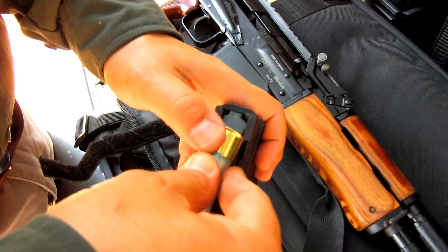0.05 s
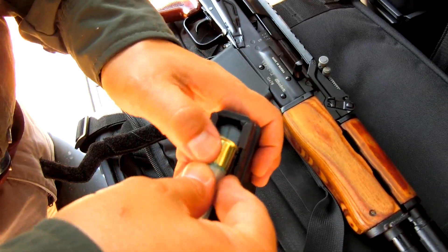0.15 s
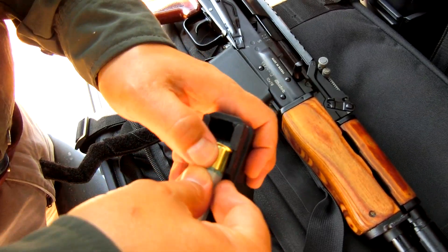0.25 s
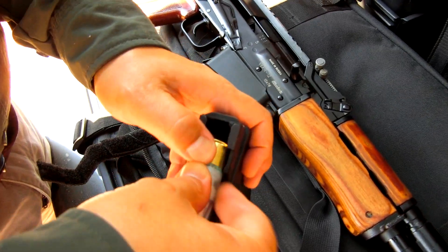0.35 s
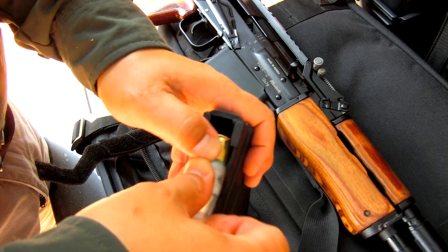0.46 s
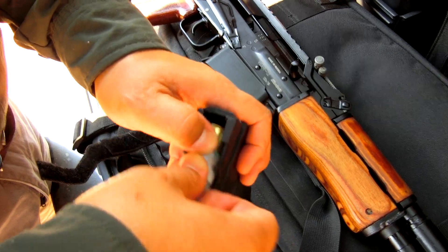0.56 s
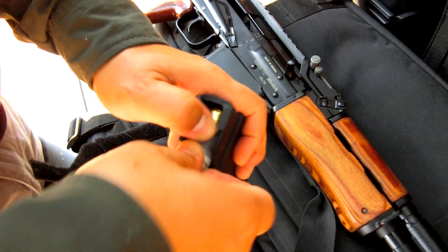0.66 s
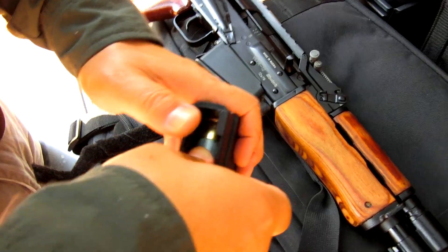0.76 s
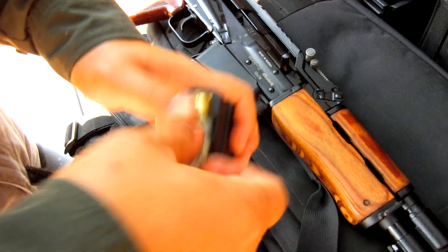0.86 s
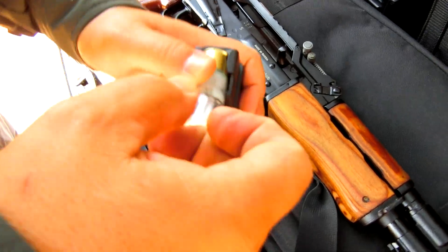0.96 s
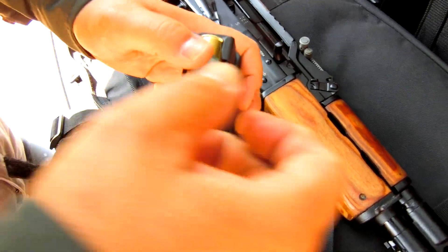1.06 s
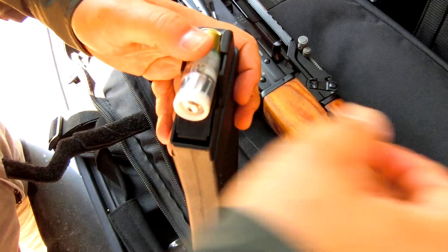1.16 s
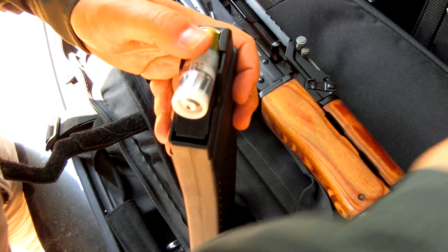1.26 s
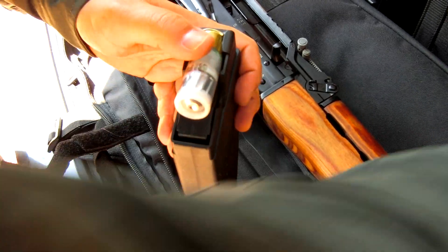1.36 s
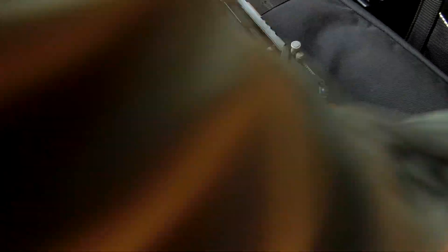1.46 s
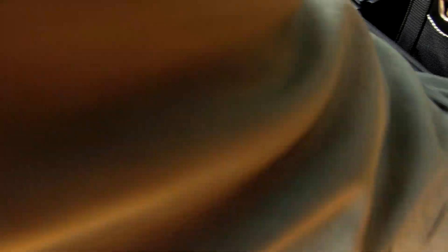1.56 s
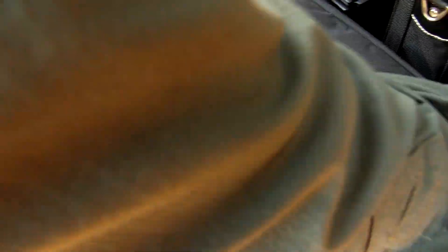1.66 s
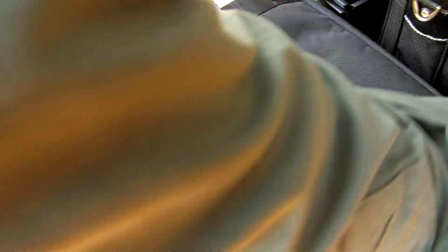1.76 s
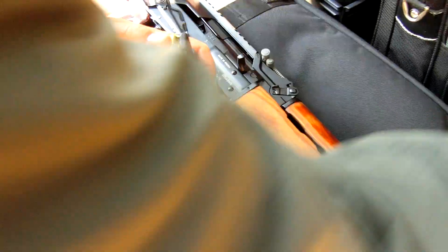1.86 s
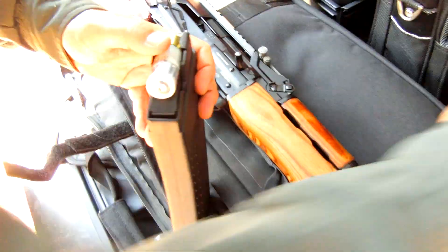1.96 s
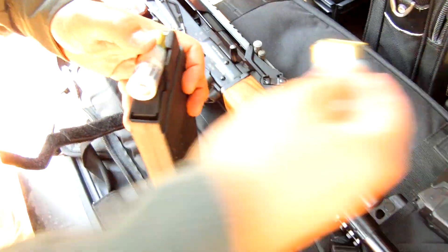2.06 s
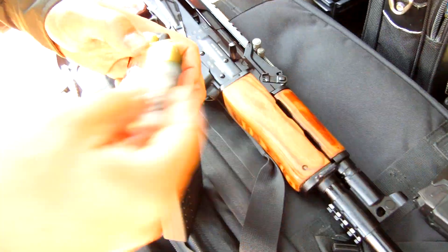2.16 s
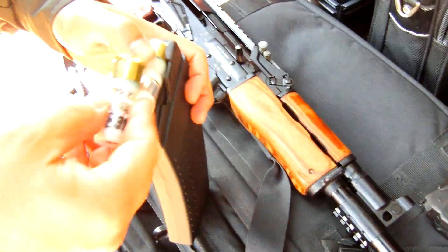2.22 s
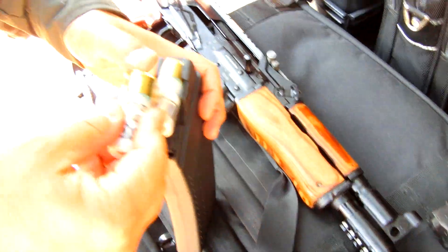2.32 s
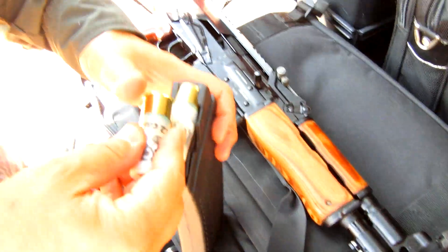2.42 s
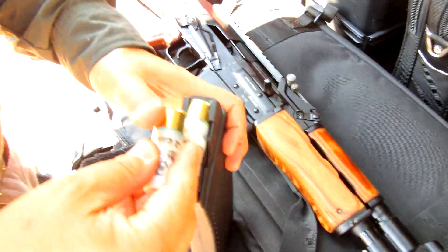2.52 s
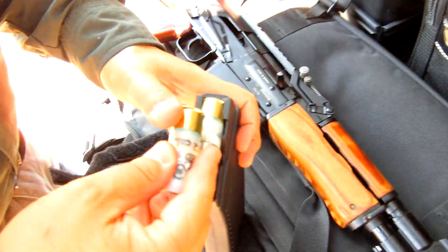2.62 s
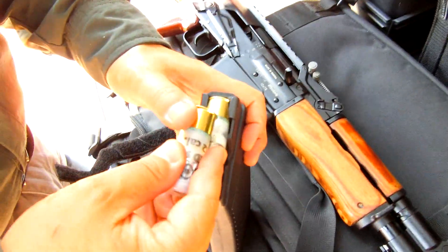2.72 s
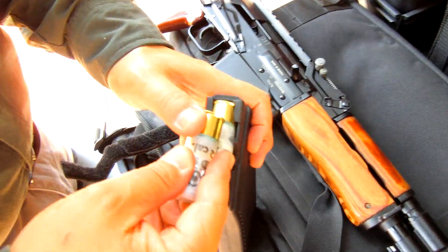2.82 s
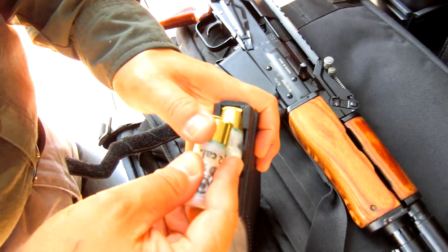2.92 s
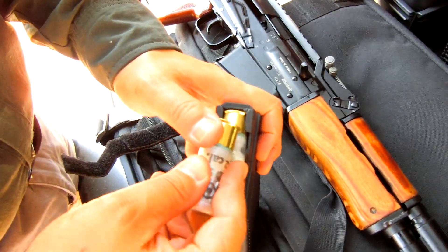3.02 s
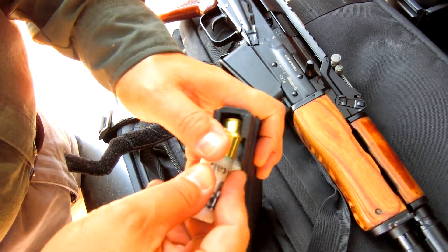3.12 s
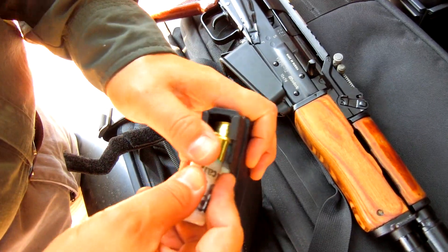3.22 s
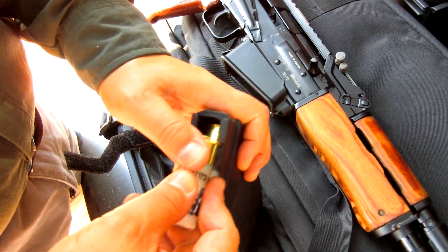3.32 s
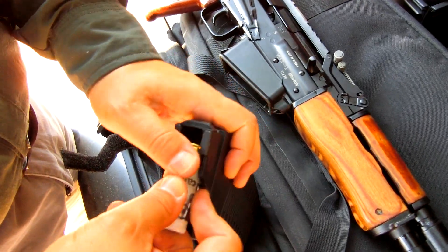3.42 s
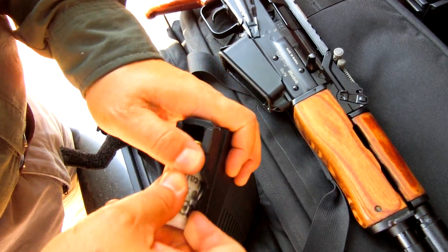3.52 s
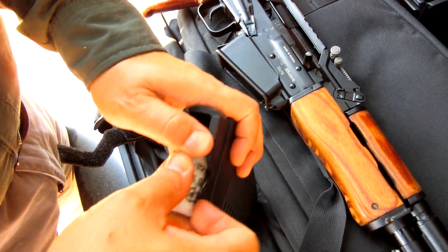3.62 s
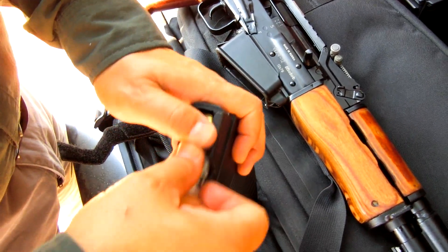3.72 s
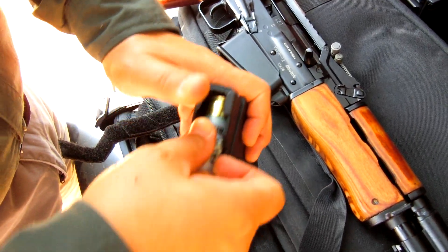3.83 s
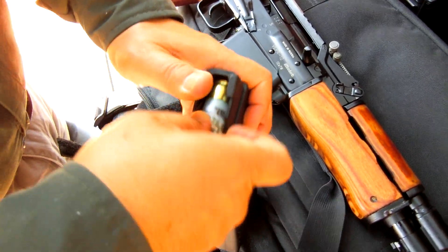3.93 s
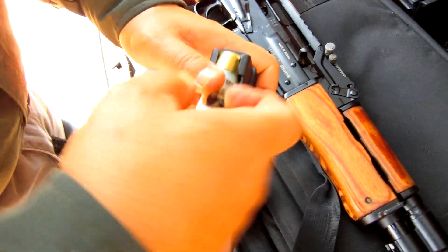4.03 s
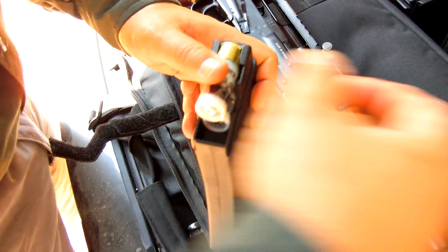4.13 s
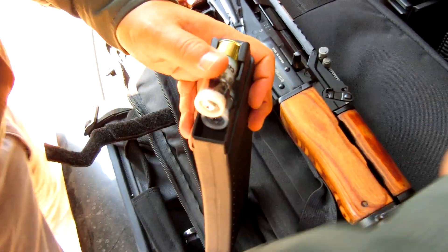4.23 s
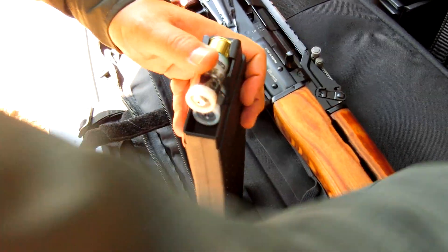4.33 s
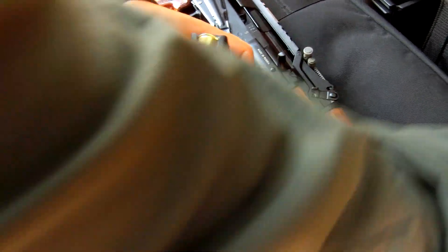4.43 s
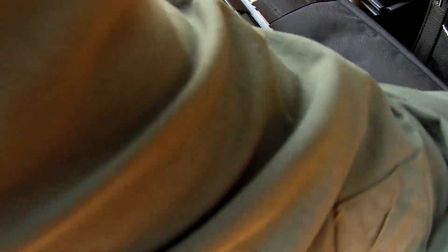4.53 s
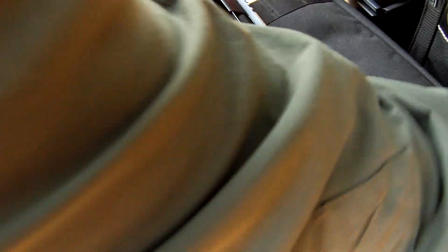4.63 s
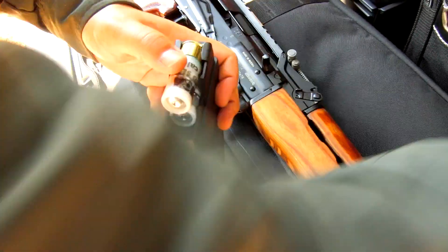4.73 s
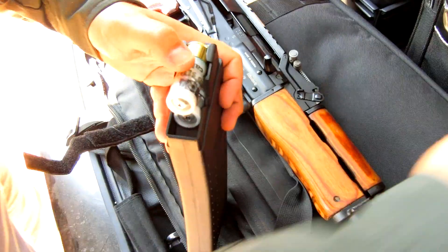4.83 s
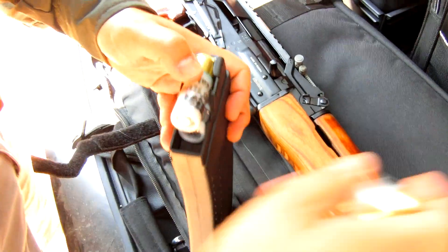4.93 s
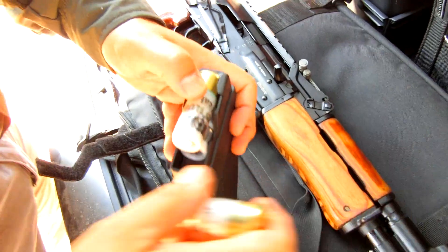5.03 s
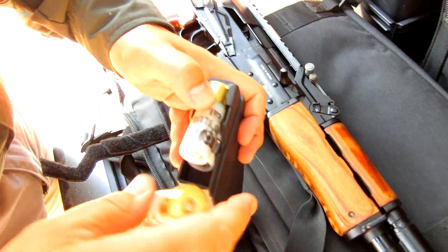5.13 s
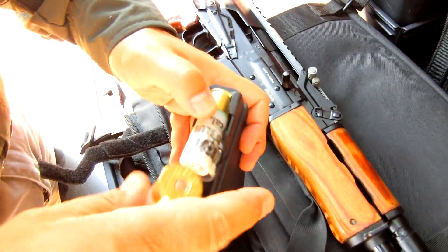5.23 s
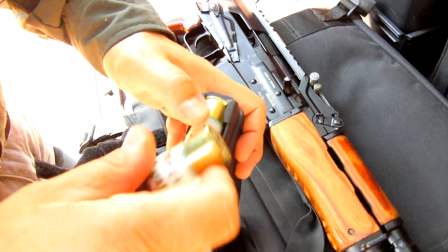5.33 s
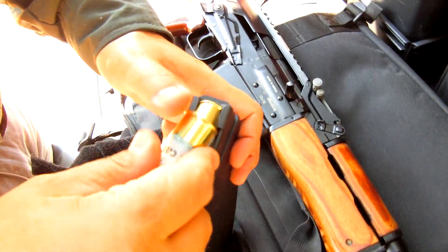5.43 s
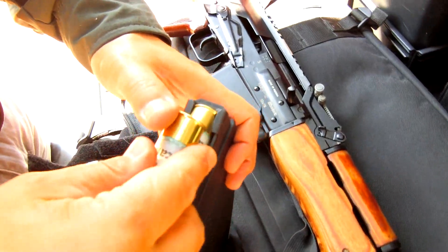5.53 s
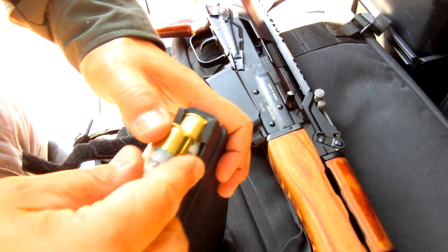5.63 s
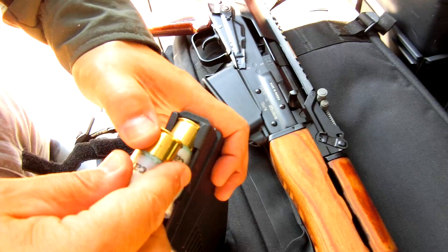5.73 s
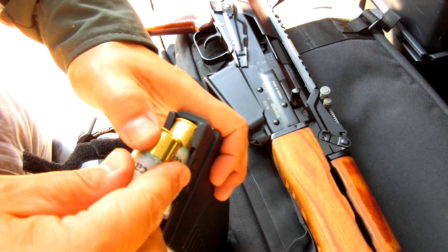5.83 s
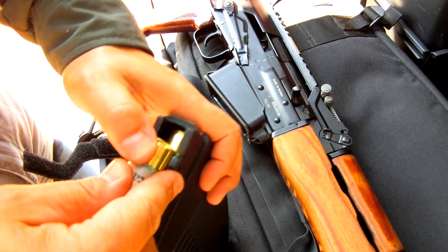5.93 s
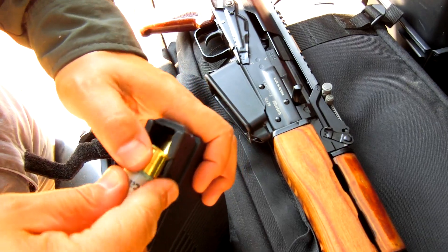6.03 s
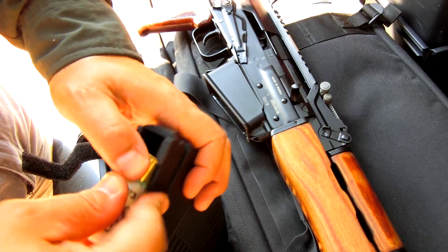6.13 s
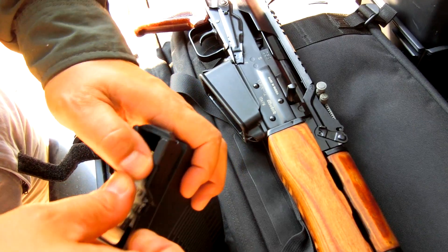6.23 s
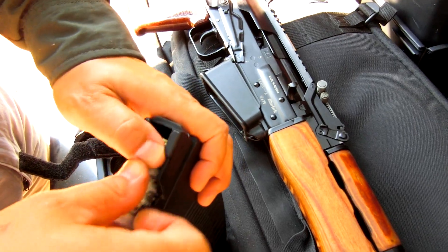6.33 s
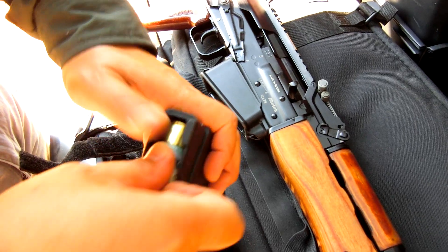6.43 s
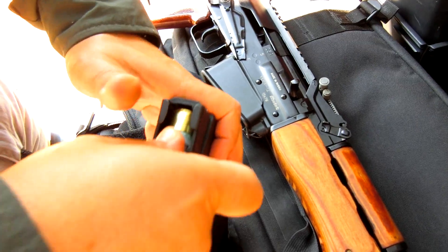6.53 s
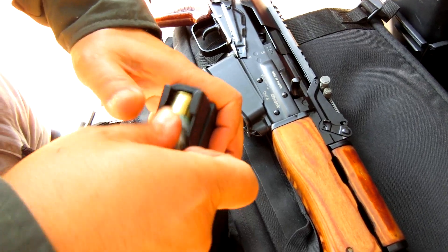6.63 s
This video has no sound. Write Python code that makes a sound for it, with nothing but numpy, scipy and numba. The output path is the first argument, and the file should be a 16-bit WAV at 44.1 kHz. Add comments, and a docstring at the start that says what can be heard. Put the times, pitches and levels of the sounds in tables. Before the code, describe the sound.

Extremely close, dry stereo sound of shotgun shells being pushed into a stiff plastic magazine at a vehicle doorway. From 0 to 0.3 seconds small clicks and a gritty slide build to a very loud crack at 0.35, followed by hard clacks at 0.63 and 0.84. A brief lull holds low air rumble and faint rising bird chirps. From 1.5 to 2.0 a sleeve rustles over duller, hollow knocks and scrapes, ending in a firm knock at 1.99. Light ticks and soft thumps follow, with one knock at 2.4. Around 3.06 to 3.2 sharp snaps return, the loudest crack at 3.32, then clacks at 3.63 and 3.94. It quiets, with a hollow tap near 4.6. A click at 5.42 leads to scrapes from 5.8, a tight cluster of loud clacks at 6.1 to 6.2, distant chirps, and a last snap at 6.63. Short, faint cabin echo throughout.

```python
"""Sharp snaps and hollow knocks, very close: shotgun shells pressed one by one into a stiff plastic magazine.
Place: a vehicle doorway; a small camera with two microphone ports sits close to the hands.
Snaps are blows on resonant plastic, hull and brass; scrapes are stick-slip noise through the same resonances.
Behind them: air rumbling on the ports, soft thumps, a rustling sleeve, short hums and a far chirping bird.
A faint decaying noise echo places the hands in the cabin."""
import sys
import numpy as np
from scipy import signal
from scipy.fft import rfft, irfft, next_fast_len
from scipy.io import wavfile
from scipy.ndimage import uniform_filter1d
from numba import njit

SR = 44100
rng = np.random.default_rng(int(sys.argv[2]) if len(sys.argv) > 2 else 0)


def to_wav(sig):
    """Store sig (one row per channel, or 1-D mono) as 16-bit WAV at the path in sys.argv[1].

    Samples outside -1..1 are clipped; the rate is SR.
    """
    pcm = np.clip(np.atleast_2d(sig), -1, 1) * 32767
    pcm = np.round(pcm).astype(np.int16)
    wavfile.write(sys.argv[1], SR, pcm.T)  # frames by channels


N = 294147

# Steady air on the ports. Each row: time in seconds, level in dB.
AIR_LEVELS = [(0.0, -55.5), (0.48, -53), (1.09, -64), (1.37, -64), (1.6, -55.5), (2.3, -60), (2.55, -51),
              (2.88, -59), (3.2, -48), (3.55, -60), (3.76, -50.5), (4.03, -70), (4.38, -60.5), (4.8, -63.5),
              (5.4, -69.5), (5.8, -60.5), (6.2, -63.5), (6.67, -66)]
# Spectrum of that air. Each row: frequency in Hz, relative density in dB.
AIR_SPECTRUM = [(12, -35), (20, -3.5), (62, 2.5), (119, -1.5), (160, -6.5), (198, -8.5), (255, -11.5),
                (400, -14.5), (520, -40), (880, -120)]
# Sleeve and surroundings. Each row: time in seconds, low hiss in dB, high hiss in dB.
RUSTLE_LEVELS = [(0.0, -64.5, -69.5), (0.69, -60.5, -58), (0.9, -74.5, -75), (1.12, -67.5, -70.5),
                 (1.29, -57, -56), (1.46, -60.5, -62), (1.69, -48.5, -53), (1.9, -54, -57),
                 (2.19, -62.5, -67.5), (2.99, -66, -66), (3.23, -62, -65.5), (3.96, -66, -69),
                 (4.74, -64, -64.5), (5.35, -69, -69), (5.79, -63.5, -70), (6.08, -57, -65),
                 (6.46, -67.5, -69.5), (6.67, -68.5, -67)]
# Spectrum of the hiss. Each row: frequency in Hz, relative density in dB.
HISS_SPECTRUM = [(150, -43.5), (250, -7.5), (528, -10), (640, -5.5), (845, -9), (971, -9), (1280, -10),
                 (7060, -19.5), (13200, -15.5), (16000, -25.5)]
# Rising chirps. Each row: start in seconds, length in seconds, from Hz, to Hz, level before flutter in dB.
CHIRPS = [(.905, .04, 4150, 4600, -73), (1.005, .045, 4050, 4600, -71), (1.125, .045, 4050, 4600, -72),
          (2.27, .045, 3900, 4600, -70), (2.68, .045, 3800, 4400, -70), (2.815, .05, 3900, 4700, -69),
          (2.955, .045, 3900, 4700, -69), (4.075, .04, 3900, 4500, -72), (6.408, .035, 3200, 5100, -66),
          (6.482, .024, 3500, 5200, -64), (6.546, .028, 3500, 5000, -65)]
# Soft thumps of air and handling. Each row: middle in seconds, peak before port lean in dB, pitch in Hz.
SOFT_THUMPS = [(0.005, -37, 156), (0.027, -43, 94), (0.162, -42, 117), (0.188, -31, 115), (0.258, -37, 146),
               (0.448, -32.5, 146), (0.495, -44, 112), (0.556, -42, 198), (1.033, -45, 167),
               (1.11, -40.5, 133.4), (1.518, -52, 110), (1.558, -39.5, 156), (1.696, -48, 120),
               (1.995, -43, 80), (2.091, -43.5, 99), (2.271, -44.5, 150), (2.457, -41, 120),
               (2.483, -46, 124), (2.537, -35.5, 133), (2.664, -40.5, 134.5), (2.693, -40.5, 116.6),
               (2.908, -40, 109.6), (3.05, -46, 97.7), (3.214, -42, 87), (3.254, -46, 75.5),
               (3.286, -41.5, 100), (3.379, -37, 98), (3.403, -42, 158), (3.524, -44, 92.5),
               (3.725, -41.5, 156), (3.856, -41, 132), (4.379, -49, 80.6), (5.872, -52, 88),
               (5.907, -45, 122), (6.02, -50.5, 80), (6.121, -44, 70), (6.2, -46, 70), (6.366, -46, 98),
               (6.641, -42, 79.6)]
# Short hums while something slides. Each row: start in seconds, length in seconds, pitch in Hz, peak in dB.
SLIDE_HUMS = [(.075, .11, 950, -53), (.12, .035, 4050, -60), (1.685, .08, 305, -41), (1.8, .07, 620, -47),
              (5.43, .08, 975, -66)]
# Resonances of the magazine body. Each row: frequency in Hz, width in Hz, relative level in dB.
BODY_MODES = [(410, 160, -7.5), (657, 540, -3.5), (1110, 440, -3.5), (1343, 300, -4), (1696, 130, -2.5),
              (2080, 560, -9.5), (2886, 890, 3), (3550, 1300, -1.5)]
# Resonances of the shell hull. Each row: frequency in Hz, width in Hz, relative level in dB.
HULL_MODES = [(4334, 730, 7.5), (4716, 690, 6.5), (5660, 1000, 10), (5950, 800, -16.5)]
# Resonances of the brass rim. Each row: frequency in Hz, width in Hz, relative level in dB.
BRASS_MODES = [(6670, 1800, 10.5), (8800, 3700, -1.5), (10360, 900, -7), (12000, 430, -7.5),
               (13300, 1800, -14.5)]
# Slides of hull on plastic. Each row: loudest moment in seconds, swell in seconds, fade in seconds,
# stroke level in dB, loudest ring in Hz, hull in dB and brass in dB, both against the stroke level.
STROKES = [(.09, 0.1, 0.4, -47.5, 1000, -3.5, -3.5), (0.243, 0.13, 0.031, -37, 2750, -6, -5),
           (0.333, 0.02, 0.052, -35, 2340, -5.5, -4.5), (.495, 0.0088, 0.12, -62, 2210, 9, 15),
           (0.558, 0.07, 0.033, -35.5, 2220, -5, -4.5), (.648, 0.014, .09, -31, 1970, -5.5, -10.5),
           (.685, .02, 0.073, -48, 2300, -6, -2.5), (0.816, 0.027, 0.039, -22.5, 2260, -6, -6.5),
           (.837, 0.01, 0.0064, -25, 2280, 3.5, 6.5), (1.519, .008, 0.24, -37, 790, -5, -4.5),
           (1.59, 0.12, .06, -32, 820, -5.5, -14), (1.665, .02, 0.024, -29, 810, -4, -12),
           (1.755, 0.021, 0.037, -47, 900, 14.5, 4), (1.81, 0.049, 0.056, -39, 1300, 4, -1.5),
           (1.845, 0.011, 0.0083, -36.5, 1000, 4.5, 0.5), (1.945, 0.067, 0.16, -44, 2550, 9.5, 6),
           (1.985, 0.073, .01, -64, 1580, 3, -6.5), (2.038, 0.12, 0.076, -52.5, 910, -3.5, 10),
           (2.172, 0.028, 0.039, -35.5, 1190, -5.5, -6.5), (2.436, 0.012, 0.042, -30, 890, 0.5, -3),
           (2.55, 0.075, 0.087, -59, 790, 2.5, -4), (2.664, .035, .035, -48.5, 1220, 0, -7),
           (2.729, 0.026, 0.064, -49.5, 2360, -5, -4.5), (2.943, .045, 0.026, -60, 1150, 1, -10),
           (3.073, 0.025, 0.085, -29.5, 2450, -7, -4), (3.11, .02, 0.066, -45, 1820, -6, -18),
           (3.311, 0.054, 0.0088, -39.5, 2210, -6, -6), (3.336, 0.013, 0.13, -36.5, 2330, -10, -14.5),
           (3.352, .004, 0.038, -35, 2300, -1.5, 2.5), (3.385, .05, 0.099, -61, 1350, -5, -9.5),
           (3.499, 0.013, 0.022, -39, 2560, -11, -4), (3.632, 0.017, 0.018, -28.5, 2420, -14, -1.5),
           (3.65, .015, 0.1, -34.5, 1790, -3.5, -5), (3.73, 0.031, .07, -40.5, 1520, -5.5, -6),
           (3.942, 0.049, .01, -28.5, 1900, -11.5, -3.5), (4.465, .1, .06, -57, 1100, -1, 1),
           (5.125, .06, .06, -69, 2050, -5, 8), (5.195, 0.092, 0.033, -68, 2000, -7, 10.5),
           (5.639, 0.031, .03, -54.5, 1300, -11.5, -9.5), (5.684, .03, 0.053, -52.5, 1350, -16.5, -6),
           (5.724, 0.062, 0.044, -57, 1900, -17, -12), (5.887, 0.083, 0.074, -30.5, 2130, -6, -5.5),
           (6.013, 0.054, 0.047, -31, 2080, -6, -4), (6.101, 0.019, .01, -27, 2230, -7, -6.5),
           (6.13, 0.016, 0.11, -30.5, 1580, -6, -5.5), (6.188, 0.042, .01, -54, 1460, -2.5, 3),
           (6.356, 0.034, .01, -42, 1200, 1, -3), (6.375, .02, 0.2, -50.5, 1420, -2.5, -0.5),
           (6.619, 0.042, 0.0089, -33, 1540, -5, -6.5)]
# Snaps and knocks. Each row: first contact in seconds, peak in dB, loudest ring in Hz, body against ring in dB,
# then hull, brass and thud (early rms against the peak) in dB, chatter T60 in seconds, chatter drive in dB.
SNAPS = [(0.05, -41, 2000, -14, -15.5, -25, -36, 0.06, -11.0),
         (0.195, -33, 2820, 2, -31, -11, -11, 0.087, -5),
         (0.226, -28.5, 2780, -4, -20, -32, -21.5, 0.069, 4),
         (0.26, -34, 2580, -2.0, -24, -35, -37, 0.037, -4),
         (0.346, -17, 2380, 3, -29, -14, -27.5, 0.099, 1),
         (0.352, -3, 2400, -6, -15.5, -14.5, -38, 0.039, -9),
         (0.492, -40.5, 3500, -1, -12, -7.5, -11, 0.048, -5),
         (0.548, -29, 2460, 7, -20, -37, -20.5, 0.055, -6),
         (0.632, -4.5, 2270, 9.5, -12.5, -9.5, -33, 0.058, -10.5),
         (0.67, -18, 2180, -2.0, -22, -19, -29, 0.051, -6.5),
         (0.674, -28.5, 3200, -4, -27, -8, -35, 0.067, -4),
         (0.774, -36.5, 3260, -5, -10.5, -5.5, -25, 0.024, -4),
         (0.795, -36, 2260, -2.0, -24, -30, -30, 0.055, -6),
         (0.813, -30.5, 2300, 5, -10, -8, -15.5, 0.048, -3),
         (0.84, -3.5, 2980, 0.5, -15.5, -11, -38, 0.06, -13),
         (0.842, -16, 2980, -9.5, -13, -19, -23.5, 0.041, 2),
         (1.492, -38.5, 694, -19, -27, -23, -23, 0.034, -17),
         (1.517, -34, 1770, 4, -14, -21, -15, 0.049, -15), (1.557, -21.5, 654, 2, -13.5, -14, -31, 0.11, 2),
         (1.582, -21.5, 836, 9, -8.5, -18, -27, 0.11, -6), (1.633, -19.5, 730, -5, -20, -21, -34, 0.049, 8),
         (1.664, -26.5, 2940, 14, -9.5, -7, -27, 0.048, 0),
         (1.674, -13, 703, 11.5, -20, -21, -30, 0.05, -16), (1.699, -32, 605, 10, -6, -7.5, -16, 0.081, 8),
         (1.749, -30.5, 610, -1, -23, -12, -19, 0.074, -8),
         (1.759, -14, 764, 11, -23, -16.5, -43, 0.035, -11.0),
         (1.782, -18.5, 1590, 12, -11, -14, -41, 0.063, 7),
         (1.799, -21, 685, 9, -12, -10.5, -39, 0.15, -10), (1.843, -28, 1590, 15, -14, -34, -34, 0.028, -1),
         (1.911, -42.5, 665, -8, 2, 0, -32, 0.095, -3), (1.97, -22, 830, 12, -28, -27, -27, 0.046, -17),
         (1.991, -8.5, 1170, -5, -15, -19.5, -19, 0.083, -1.5),
         (2.084, -39.5, 581, 7, -14, -23, -16, 0.14, -9.5),
         (2.152, -34, 2860, 3, -11, -10.5, -21, 0.063, -11.0),
         (2.167, -40.5, 1160, -9, -21, -11, -11.5, 0.1, 1), (2.368, -50, 840, 5, -1, -4, -37, 0.055, -16.5),
         (2.417, -20, 780, 7, -20, -22, -25, 0.071, -10.5),
         (2.529, -41.5, 767, -10, -19.5, -21, -17, 0.076, -15),
         (2.632, -46.5, 727, -2.0, -9, -17.5, -21.5, 0.089, -11.0),
         (2.656, -29, 1210, 2, -13, -19.5, -22.5, 0.053, -9),
         (2.715, -43.5, 990, 7, -20, -9, -32, 0.06, -15),
         (2.727, -34.5, 2660, -4, -20.5, -18, -39, 0.045, -20),
         (2.924, -44, 2800, -2.5, -19.5, -13.5, -19, 0.059, -6),
         (2.94, -39, 950, 3, -19, -19, -21, 0.084, -9),
         (3.062, -16, 2640, 8, -16.5, -12.5, -30, 0.065, -10),
         (3.09, -13, 2450, 11, -9, -7.5, -25, 0.039, -5), (3.196, -10, 2380, -1, -24, -21, -39, 0.054, 8),
         (3.219, -26.5, 2320, 10, -11.5, -14, -33, 0.043, -3),
         (3.316, 1, 2560, -16, -17, -18.5, -35, 0.025, -12),
         (3.357, -14.5, 1010, 21, -14, -11.5, -39, 0.058, -10.5),
         (3.405, -31, 1390, 12, -18, -19, -24, 0.046, -14),
         (3.431, -41.5, 3140, -2.0, -10, -6.5, -33, 0.047, -14),
         (3.499, -27.5, 3370, 17, -30, -8, -22, 0.052, -8.5),
         (3.633, -10, 2020, -5.5, -34, -24.5, -36, 0.04, -9.5),
         (3.666, -21.5, 1300, 14, -11, -10.5, -27.5, 0.061, -10),
         (3.699, -33, 2140, -2.0, -19, -29, -29, 0.055, -11.0),
         (3.718, -31, 1200, 2, -18, -24, -18.5, 0.036, -3),
         (3.751, -28, 3320, -3, -17.5, -37, -37, 0.038, -11.5),
         (3.912, -47.5, 1620, 9, -8, -14, -5, 0.067, -7),
         (3.944, -2.5, 2190, 3, -12.5, -12.5, -31, 0.062, -13),
         (4.328, -47.5, 673, 5.5, -23, -17, -12, 0.06, -12.5),
         (4.432, -53.5, 1180, -3.5, -11, -11, -18, 0.055, -4),
         (4.48, -40, 592, 6.5, -20.5, -24.5, -28.5, 0.072, -16),
         (4.587, -26, 813, 10.5, -15, -20.5, -23, 0.072, -9),
         (5.369, -48.5, 655, 6.5, -28, -16, -25, 0.051, -10),
         (5.42, -23, 2290, 13, -14.5, -15.5, -24, 0.056, -11.0),
         (5.718, -40, 1700, -8.5, -23, -25, -19.5, 0.045, -6),
         (5.809, -37.5, 2180, 7, -18, -24, -26, 0.055, -12), (5.86, -21, 2100, 1, -18, -18, -26, 0.041, -9),
         (5.991, -29, 1870, -10, -14, -18, -28, 0.055, -11.0),
         (6.015, -29, 2170, 23, -9, -12, -24, 0.1, -5), (6.046, -37.5, 1220, 5, -20, -16, -18, 0.059, -4),
         (6.103, -17.5, 1670, 14, -14, -8, -39, 0.046, -13),
         (6.11, -3.5, 1590, -5, -20.5, -20.5, -34, 0.04, -12),
         (6.175, -20, 1460, 8.5, -21.5, -16.5, -25, 0.04, -14),
         (6.19, -18.5, 1585, -11, -12, -12.5, -25, 0.12, -20),
         (6.195, -2.5, 1850, -2.5, -26, -16.5, -38, 0.035, -1.5),
         (6.238, -37.5, 1260, 13, -12.5, -22, -24, 0.049, -11.0),
         (6.303, -26.5, 1640, 8, -39, -34, -28, 0.047, -10),
         (6.355, -21, 1010, 0.5, -21.5, -18.5, -23, 0.043, -2),
         (6.574, -44, 1500, 14.5, -13.5, -15, -19, 0.085, -6),
         (6.622, -24, 1670, -12, -23, -8, -21, 0.03, -12),
         (6.627, -9.5, 1670, 7, -14, -8, -34.5, 0.065, -12)]

SIDES = np.array([[1], [-1]])  # left port, right port
CABIN_T60_S, CABIN_DB = 0.11, -19.5
PORT_LAG_S = 1.3e-5  # the right port hears the hands later
TOP_HZ = 16300
SLIP_S, SLIP_DB = .005, -11  # slip ahead of the blow
BLOW_LAG_S = .001  # from first contact to the blow
BLOW_S = .01  # span over which a blow's early level is set
PAN_SCATTER_DB = 2.5
RING_WIDTH = 0.28  # share of the ring's pitch
STROKE_RANGE_DB = 30  # from the ends of a stroke to its loudest moment
# a hard snap jolts the camera: pitch, level against the snap, snaps that are hard enough
JOLT_HZ, JOLT_DB, HARD_DB = 167, -36, -12


def undb(db):
    """Turn dB into an amplitude factor."""
    return 10 ** (np.asarray(db) / 20)


def unit(x):
    """Scale to rms 1."""
    return x / np.sqrt(np.mean(x ** 2))


def peak(x, db):
    """Scale to a peak level."""
    return x * undb(db) / np.abs(x).max()


def firm(x, db):
    """Scale to an rms level over the first moments of a blow."""
    hit = int(SLIP_S * SR)
    early = x[..., hit:hit + int(BLOW_S * SR)]
    return x * undb(db) / np.sqrt(np.mean(early ** 2))


@njit
def svf(x, g, k):
    """State-variable band-pass, gain 1 at the centre."""
    y, b, l = np.empty(len(x)), 0., 0.
    c = 1 / (1 + g * (g + k))
    for i in range(len(x)):
        v = (b + g * (x[i] + 1e-18 - l)) * c
        b, l, y[i] = 2 * v - b, l + 2 * g * v, k * v
    return y


def band(x, hz, width):
    """Band-pass of given centre and width in Hz."""
    return svf(x, np.tan(np.pi * hz / SR), width / hz)


def ring(x, modes, scatter_db):
    """Resonances in parallel; pitches and levels scatter since each blow lands elsewhere."""
    out = 0
    for hz, width, db in modes:
        level_chance, pitch_chance = rng.standard_normal(2)
        gain = undb(db + scatter_db * level_chance) / np.sqrt(width)
        out = out + gain * band(x, hz * (1 + .02 * pitch_chance), width)
    return out


def ring_body(x, scatter_db):
    """The magazine's resonances inside one broad band."""
    return band(ring(x, BODY_MODES, scatter_db), 1600., 3000.)


def ring_pair(pair, modes, scatter_db, hz, width):
    """Resonances inside one broad band; the second port is run straight after the first."""
    return band(ring(pair.ravel(), modes, scatter_db), hz, width).reshape(2, -1)


def ring_hull(pair, scatter_db):
    """The shell hull's resonances at both ports."""
    return ring_pair(pair, HULL_MODES, scatter_db, 5200., 3500.)


def ring_brass(pair, scatter_db):
    """The brass rim's resonances at both ports."""
    return ring_pair(pair, BRASS_MODES, scatter_db, 12000., 14000.)


def curve(table):
    """Columns of a curve table, one value a sample."""
    s, *columns = np.transpose(table)
    return [np.interp(np.arange(N) / SR, s, c) for c in columns]


def walk(rate):
    """Random levels held 1 / rate s and slewed twice; spread near 1."""
    k = int(SR / rate)
    steps = np.repeat(rng.standard_normal(N // k + 1), k)
    return 1.7 * uniform_filter1d(uniform_filter1d(steps, k), k)[:N]


def coloured(points):
    """Noise with a spectrum of (Hz, dB) points, joined on a log frequency axis."""
    hz, db = np.transpose(points)
    n = next_fast_len(N, True)
    f = np.maximum(np.arange(n // 2 + 1) * SR / n, 1)
    gain = undb(np.interp(np.log(f), np.log(hz), db))
    return irfft(rfft(rng.standard_normal(n)) * gain, n)[:N]


def add(out, s, sound):
    """Mix a short sound in at time s."""
    i = int(s * SR)
    n = min(sound.shape[-1], N - i)
    out[..., i:i + n] += sound[..., :n]


def rumble():
    """Air on the microphone: low noise that flutters, mostly unrelated at the two ports."""
    shared, *own = (unit(coloured(AIR_SPECTRUM)) for _ in range(3))
    gusts = walk(7)
    ports = np.array([unit((p + .6 * shared) * undb(3.5 * walk(30) + gusts)) for p in own])
    return ports * undb(curve(AIR_LEVELS)[0])


def rustle():
    """Hiss in two ranges that flicker apart; the ports share most of the low range, little of the high."""
    low_db, high_db = curve(RUSTLE_LEVELS)
    split = signal.butter(3, 5000, fs=SR, output="sos")
    mid, side = coloured(HISS_SPECTRUM), coloured(HISS_SPECTRUM)
    low_mid, low_side = [signal.sosfiltfilt(split, v) for v in (mid, side)]
    high_mid, high_side = mid - low_mid, side - low_side
    # the ports part further towards the top of the low range
    spread = .35 * low_side + 0.52 * (low_side - uniform_filter1d(low_side, 12))
    low = (low_mid + SIDES * spread) / low_mid.std()
    high = (high_mid + SIDES * high_side) / high_mid.std()
    return low * undb(low_db + walk(20)) + high * undb(high_db + walk(15))


def bird():
    """A far bird: upward near-sine sweeps of fluttering level, two samples later at the right port."""
    out = np.zeros(N)
    for s, length, hz0, hz1, db in CHIRPS:
        n = int(length * SR)
        phase = 2 * np.pi * np.cumsum(np.linspace(hz0, hz1, n)) / SR
        add(out, s, undb(db) * np.hanning(n) ** .5 * np.sin(phase))
    out = out * undb(2 + 2 * walk(300))
    return np.array([out, np.roll(out, 2)])


def thumps():
    """Air, handling and jolts: a couple of low cycles each, unequal and out of step at the ports."""
    out = np.zeros((2, N))
    jolts = [(s + 1 / JOLT_HZ, db + JOLT_DB, JOLT_HZ) for s, db, *_ in SNAPS if db > HARD_DB]
    for s, db, hz in SOFT_THUMPS + jolts:
        phase, skew, lean = rng.standard_normal(3)
        n = int(2.4 * SR / hz)
        cycles = np.cos(2 * np.pi * hz * np.arange(n) / SR + 3 * phase + 0.77 * skew * SIDES)
        add(out, max(s - n / SR / 2, 0), cycles * np.hanning(n) * undb(db + 2 * lean * SIDES))
    return out


def hums():
    """Something slides and hums: short sine tones of wavering pitch, equal at both ports."""
    out = np.zeros(N)
    for s, length, hz, db in SLIDE_HUMS:
        n = int(length * SR)
        wobble = uniform_filter1d(rng.standard_normal(n), 300) * 0.12
        phase = 2 * np.pi * hz * np.cumsum(1 + wobble) / SR
        add(out, s, undb(db) * np.hanning(n) ** .5 * np.sin(phase))
    return out


def scrapes():
    """Dense stick-slip grains drive a ring, the body, the hull and the brass; each stroke swells and fades."""
    size = undb(2.6 * rng.exponential(size=N) + 2.2 * walk(350) + walk(80))
    grains, other = rng.standard_normal((2, N)) * size
    body = unit(ring_body(grains, scatter_db=0))
    pair = grains + .5 * SIDES * other
    hull = unit(ring_hull(pair, scatter_db=0))
    brass = unit(ring_brass(pair, scatter_db=0))
    out = np.zeros((2, N))
    for s, swell, fade, db, hz, hull_db, brass_db in STROKES:
        start, end = s - swell, s + fade
        i = np.arange(max(int(start * SR), 0), min(int(end * SR), N))
        ends_db = db - STROKE_RANGE_DB
        shape = undb(np.interp(i / SR, [start, s, end], [ends_db, db, ends_db]))
        main = unit(band(band(grains[i], hz, .15 * hz), hz, hz))
        low = undb(-8.5) * main + undb(-6) * body[i]
        out[:, i] += shape * (low + undb(hull_db) * hull[:, i] + undb(brass_db) * brass[:, i])
    return out


def clicks():
    """A short slip, a sharp blow, then dying chatter of loose parts ring the magazine, the hull and the brass."""
    out = np.zeros((2, N))
    t = np.arange(SR // 7) / SR - SLIP_S  # 0 at the blow
    hit = int(SLIP_S * SR)
    for s, db, hz, body_db, hull_db, brass_db, thud_db, t60, chatter_db in SNAPS:
        grit = unit(rng.standard_normal((2, len(t))) * undb(3.4 * rng.exponential(size=len(t))))
        shape = np.where(t < 0, undb(SLIP_DB + 7000 * t), undb(-60 * t / t60))
        push, other = undb(chatter_db) * grit * shape
        push[hit] += 2  # the blow itself
        main = peak(band(band(push, hz, RING_WIDTH * hz), hz, hz), 0)
        body = peak(ring_body(push, scatter_db=2), body_db)
        thud = firm(band(band(push, 290.0, 280.0), 360.0, 350.0), db + thud_db)
        # short waves reach the two ports by different paths; small parts die sooner
        pair = (push + .4 * SIDES * other) * undb(-300 * np.maximum(t, 0))
        hull = firm(ring_hull(pair, scatter_db=2), db + hull_db)
        brass = firm(ring_brass(pair, scatter_db=2), db + brass_db)
        pan = undb(SIDES * PAN_SCATTER_DB * rng.standard_normal() / 2)
        snap = peak(main + body, db) + thud + hull + brass
        add(out, s + BLOW_LAG_S - SLIP_S, snap * pan)
    return out


def right_port(x):
    """The right port is a few millimetres further away and shaded in the treble."""
    n = next_fast_len(N, True)
    f = np.arange(n // 2 + 1) * SR / n
    lag = np.exp(-2j * np.pi * f * PORT_LAG_S)
    shade = undb(-3.0 * (f / 12000) ** 2)
    return irfft(rfft(x, n) * lag * shade, n)[:N]


def cabin(x):
    """Diffuse echo: decaying noise of unit energy, separate at each port, silent for the first 3 ms."""
    t = np.arange(SR // 5) / SR
    echo = rng.standard_normal((2, len(t))) * undb(-60 * t / CABIN_T60_S) * (t > .003)
    echo /= np.sqrt(np.sum(echo ** 2, axis=1, keepdims=True))
    return signal.fftconvolve(x, echo, axes=1)[:, :N]


def scene():
    """Background straight at the ports, and the close hands with their cabin echo."""
    background = rumble() + rustle() + bird() + thumps()
    hands = hums() + scrapes() + clicks()
    hands[1] = right_port(hands[1])
    return background + hands + undb(CABIN_DB) * cabin(hands)


def record(dry):
    """Peaks beyond 0.93 of full scale are clipped, then a steep low-pass cuts the top."""
    low_pass = signal.ellip(8, .2, 70, TOP_HZ, fs=SR, output="sos")
    return signal.sosfilt(low_pass, np.clip(dry, -.93, .93))


dry = scene()
out = record(dry)
to_wav(out)
```